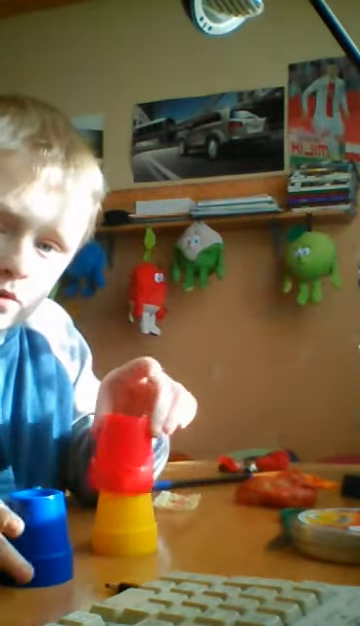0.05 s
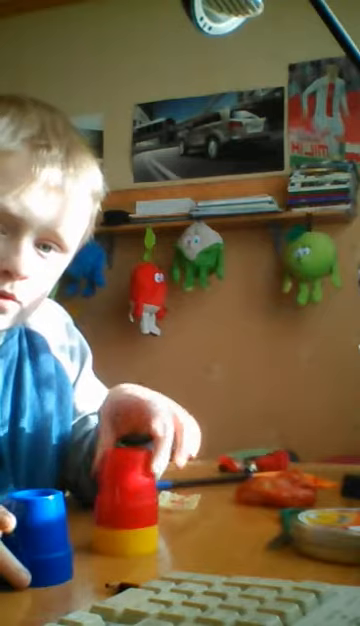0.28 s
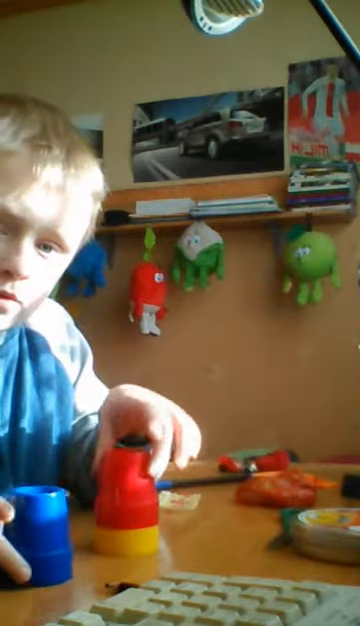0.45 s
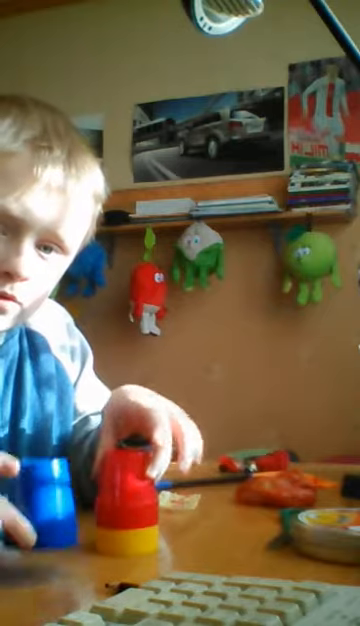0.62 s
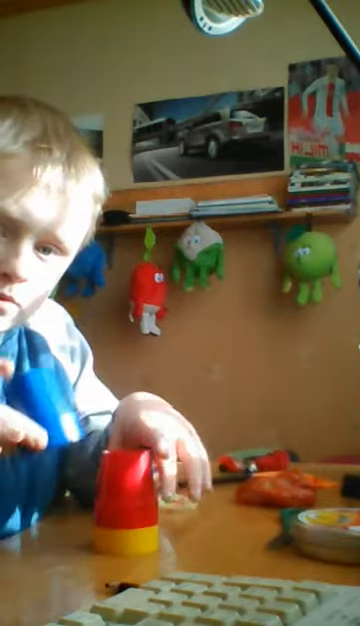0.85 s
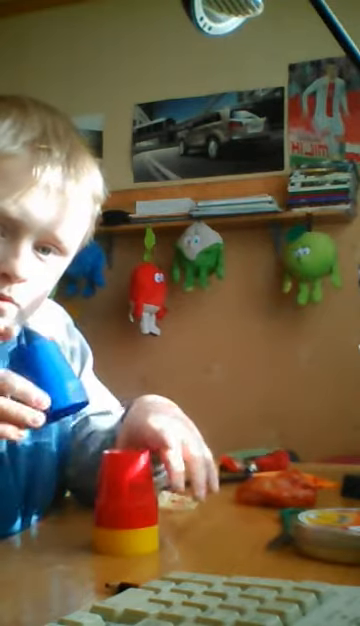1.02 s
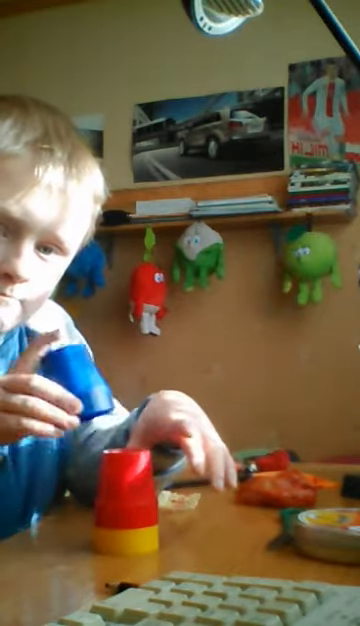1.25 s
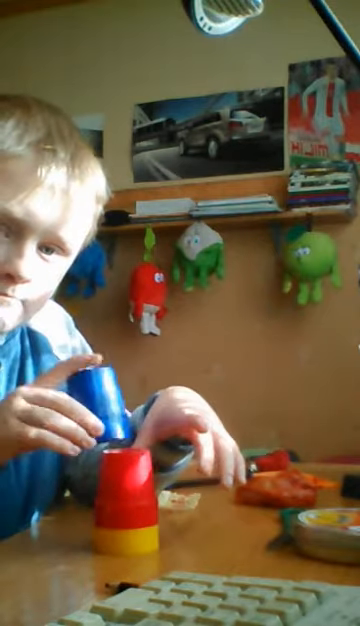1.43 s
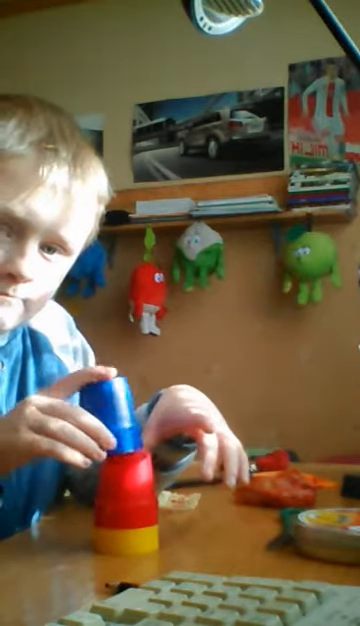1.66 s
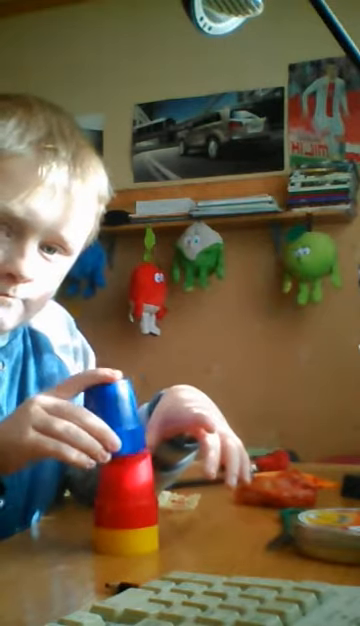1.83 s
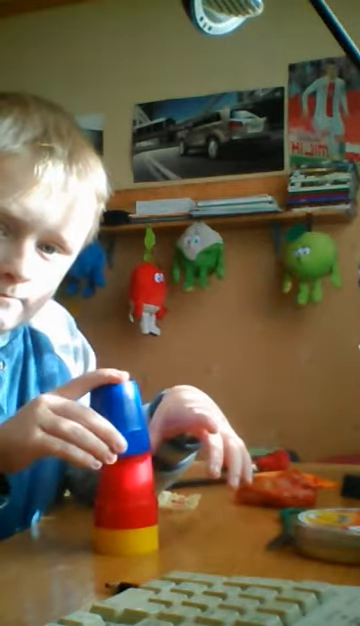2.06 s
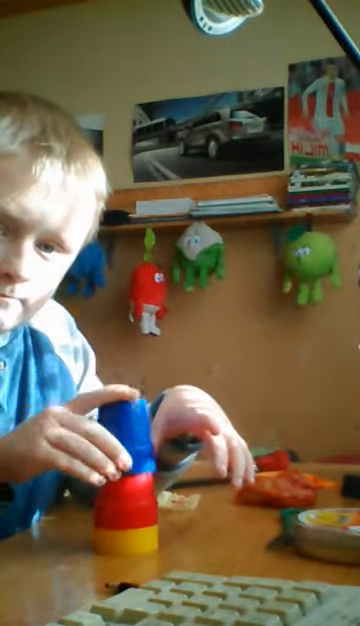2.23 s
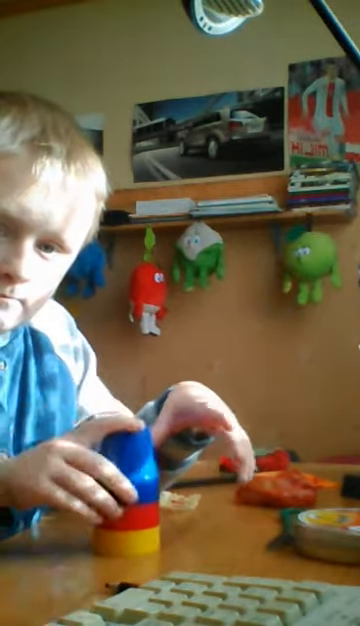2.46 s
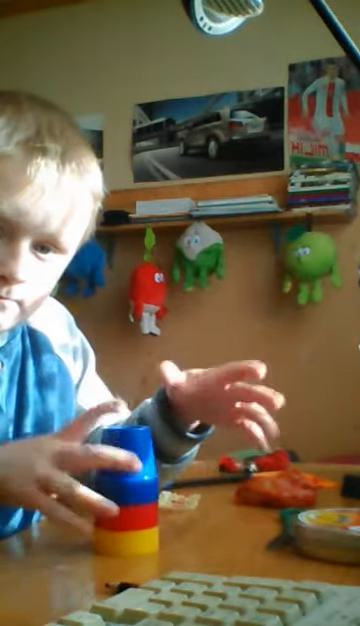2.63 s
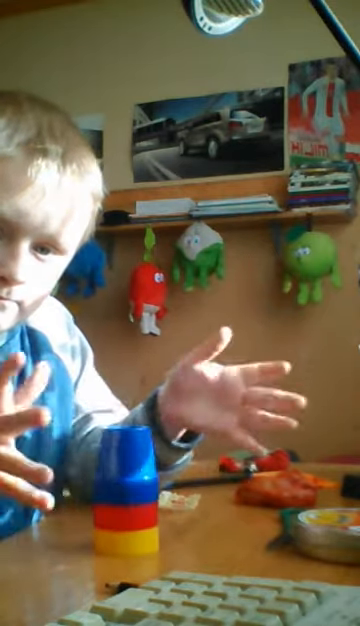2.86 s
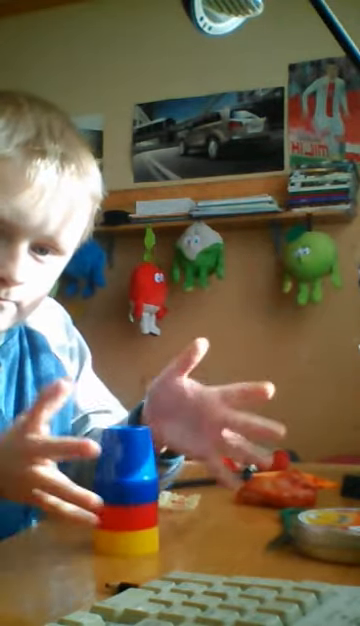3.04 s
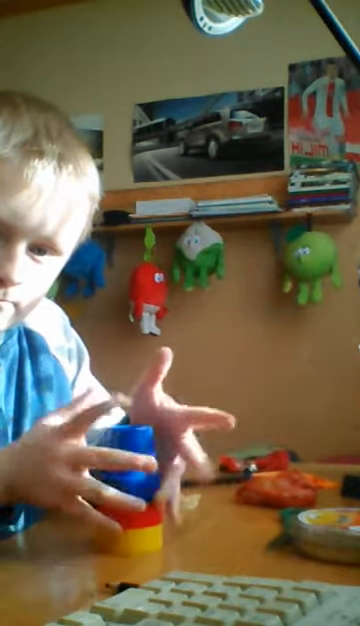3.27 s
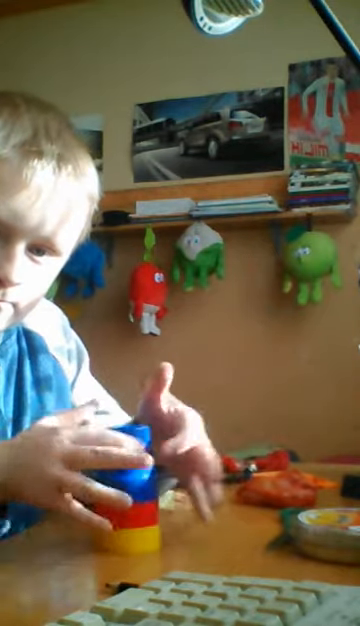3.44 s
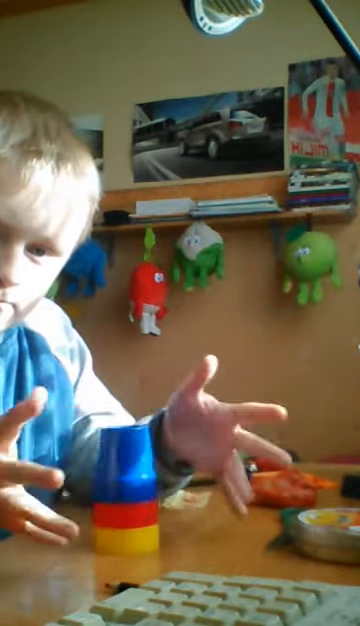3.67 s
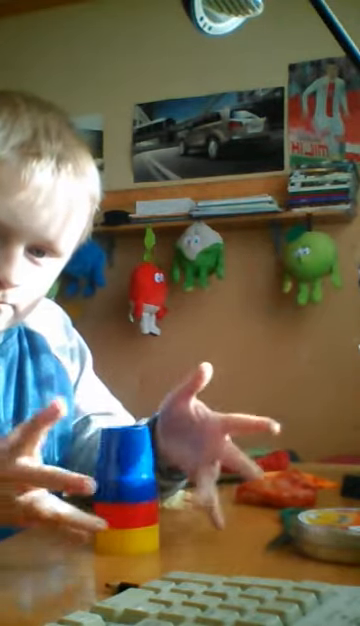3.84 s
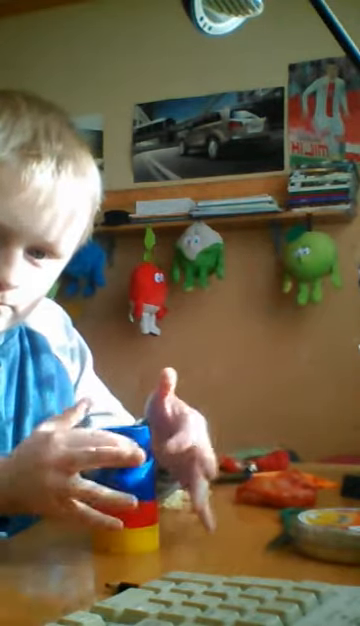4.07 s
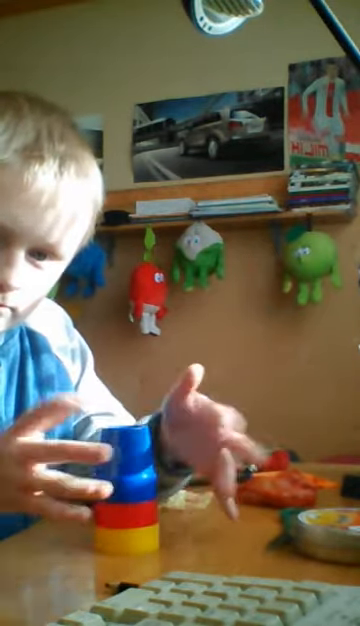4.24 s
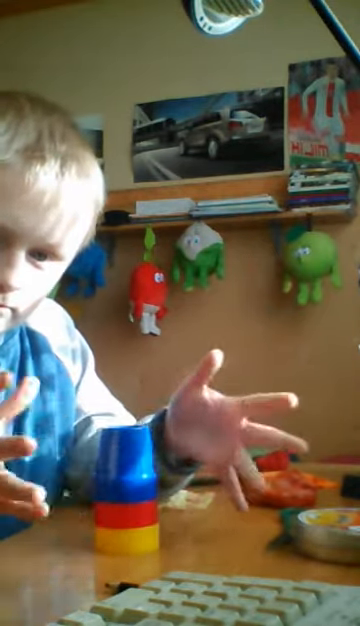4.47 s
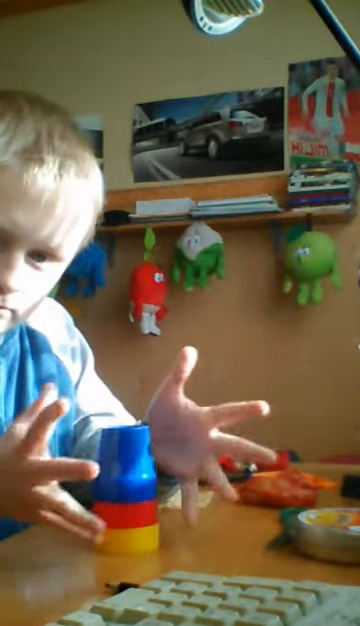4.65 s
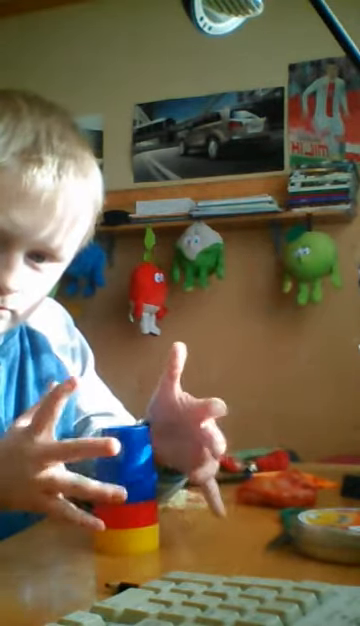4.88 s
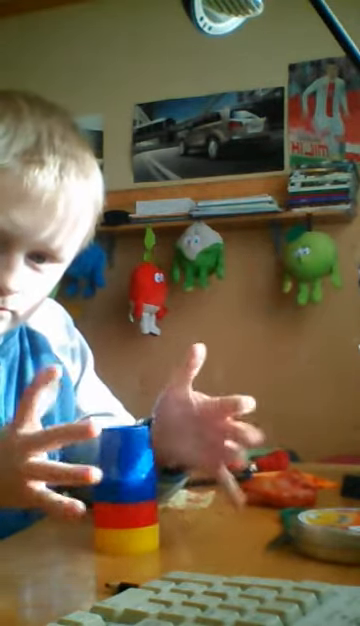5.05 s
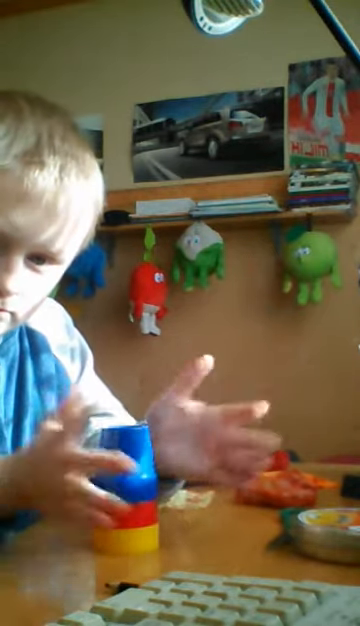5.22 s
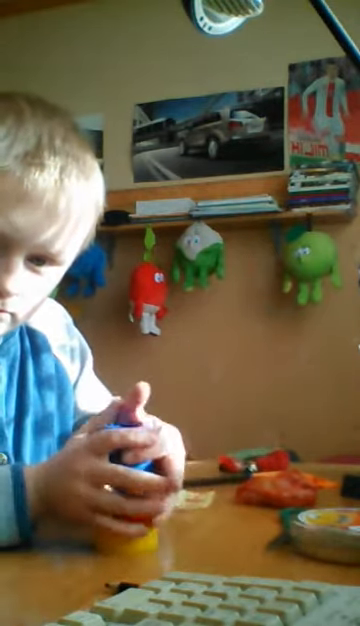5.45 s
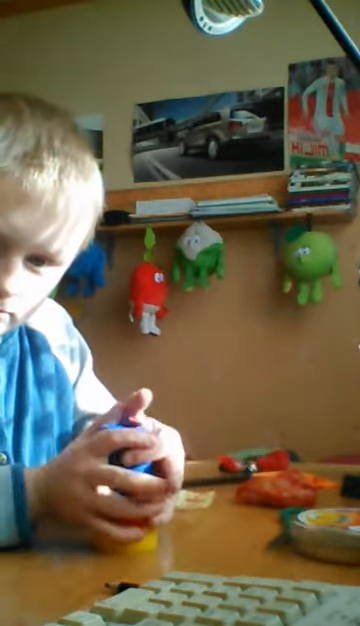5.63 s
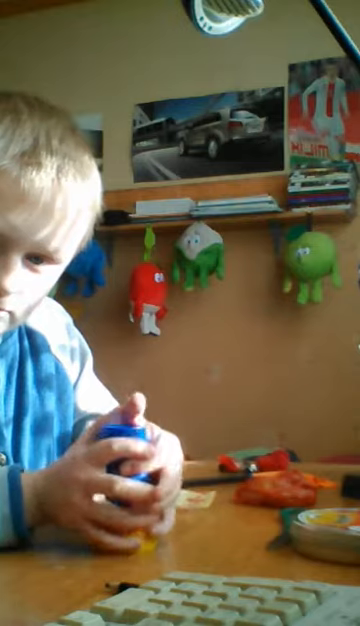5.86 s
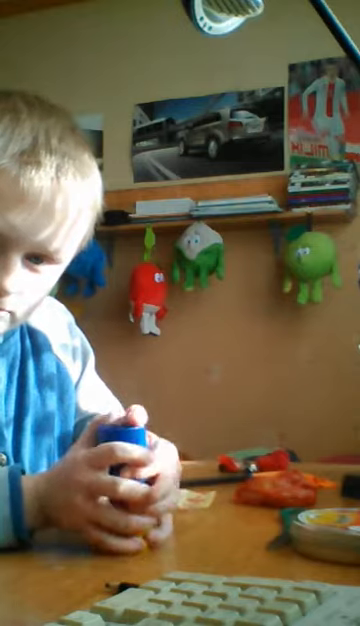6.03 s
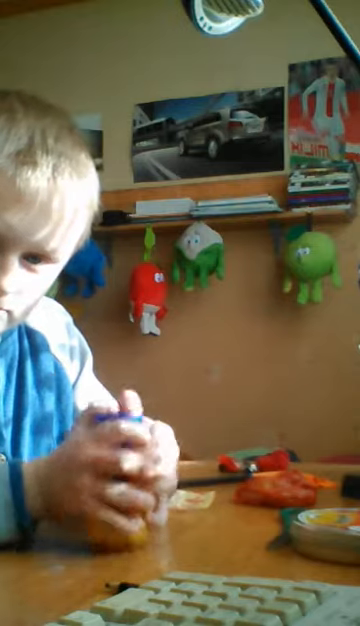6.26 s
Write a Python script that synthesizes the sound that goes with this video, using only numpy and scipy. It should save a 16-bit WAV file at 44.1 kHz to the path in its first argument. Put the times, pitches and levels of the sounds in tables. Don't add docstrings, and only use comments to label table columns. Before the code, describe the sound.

A small bedroom, close cheap microphone, low rumble and soft hiss throughout, with a barely audible wall clock ticking once a second from about 0.6. At 0.3 a rapid burst of hollow plastic clacks sounds as one cup drops over another, with a light desk thud and a soft tap at 0.45. Faint handling leads to plastic scraping from 1.4 and a crisp double knock at 1.55. Tiny touches run from 1.8 to 2.1, then a loud chattering clatter at 2.33-2.4 with a low desk thump and a brief scrape and rustle. Smaller taps come at 3.15-3.4. It stays quiet, with faint cloth movement and a tiny touch near 4.1, until a hard, bright clatter and thud at 5.3, a click and short rub at 5.4, a faint quick judder at 5.6, and soft finger taps from 5.7 to 6.05, fading into room hiss.

```python
import sys
import numpy as np
from scipy import signal
from scipy.fft import rfft, irfft
from scipy.io import wavfile

SR = 44100
rng = np.random.default_rng(int(sys.argv[2]) if len(sys.argv) > 2 else 0)


def generate_wav(sig):
    pcm = np.round(np.clip(np.atleast_2d(sig).T, -1, 1) * 32767).astype(np.int16)
    wavfile.write(sys.argv[1], SR, pcm)


def ratio_of_db(decibels):
    return 10 ** (np.asarray(decibels, float) / 20)


N = 277830

# start in seconds, level in dB, centre of the desk ring in Hz.
THUDS = [(.2859, -40, 220), (1.5482, -39, 251), (2.3334, -45, 250), (2.356, -28.5, 177), (2.545, -53, 240),
         (3.143, -44, 370), (3.158, -49.5, 374), (3.2622, -45.5, 220), (3.293, -50.5, 220),
         (3.384, -53, 241), (4.13, -54.5, 370.5), (5.3, -31, 160), (5.3089, -29.5, 330),
         (5.331, -40.5, 329), (5.8, -48, 220), (5.811, -43, 220), (5.823, -49, 221), (5.896, -52, 220)]


def cups():
    places = np.zeros((5, N))
    for k, row in enumerate(contacts()):
        chance, draw = rng.standard_normal(48), rng.random(900)
        size, noise = rng.standard_normal((2, 900))
        chatter = size * (draw < 2500 / SR)
        add(places[k % len(places)], *knock(row, chance, chatter, noise))
    for k, (s, db, hz) in enumerate(THUDS):
        thud = ring(DESK, rng.standard_normal(32), np.ones(1), 0.0046, hz)
        add(places[k % len(places)], s, ratio_of_db(db) * thud)
    no_bass = signal.butter(4, 105, "high", fs=SR, output="sos")
    places = signal.sosfilt(no_bass, places)
    return sum(near + ratio_of_db(-8) * room(near) for near in places)


# start in seconds, blow in dB, chatter in ms, hardness as treble in dB,
# centre of the wall ring in Hz.
CLACKS = [(.2805, -15, 4.7, -24, 1320), (.2859, -17, 9.1, -14.5, 1440), (0.2929, -23, 5.2, -13.5, 1160),
          (0.346, -12.5, 3.6, -21.5, 1700), (0.3497, -16, 4.4, -27.5, 1300), (1.5482, -13, 1.46, -25, 1460),
          (1.5515, -17, 2.46, -20, 1400), (2.207, -32, 11, -27, 1350), (2.3333, -16, 18, -21, 1120),
          (2.3515, -7, 4.5, -18.5, 1500), (2.356, -9.5, 4.2, -13.5, 1300), (2.3654, -10, 8.6, -16.5, 1190),
          (2.377, -18, 9.8, -9.5, 920), (2.52, -39, 15, -17, 1110), (2.545, -29, 6.5, -30.5, 1470),
          (3.144, -30.5, 4.6, -32, 1280), (3.2616, -27, 2, -31, 1280), (5.2934, -19.5, 7.4, -13, 1300),
          (5.3, -8, 5.05, -8, 1640), (5.305, -7, 4.7, -17.5, 1700), (5.3089, -10, 4.9, -11.5, 920),
          (5.317, -17, 6.5, -11, 890), (5.332, -16.5, 2.6, -26, 1550), (5.4227, -24.5, 2.2, -27, 1200)]
# start in seconds, blow in dB, chatter in ms,
# centre of the wall ring in Hz.
TAPS = [(0.074, -50.5, 9.9, 1250), (.457, -35.5, 7.7, 770), (1.78, -42.5, 16, 930), (1.799, -41, 11, 900),
        (1.826, -48, 10, 840), (1.844, -42, 1.1, 770), (2.035, -49, 17, 790), (2.064, -37, 1.5, 1400),
        (2.0696, -35, 8.7, 1104), (3.151, -28.5, 5.5, 955), (3.158, -32.5, 10, 800), (3.196, -44, 20, 1280),
        (3.2579, -34, 1.9, 1360), (3.293, -47.5, 8.5, 985), (3.384, -51, 9, 700), (4.13, -47.5, 4.7, 1005),
        (4.157, -54.5, 4.8, 600), (5.2904, -31.5, 1.6, 1200), (5.403, -29, 2.4, 1540),
        (5.526, -46, 3.9, 804), (5.722, -45.5, 4.9, 1160), (5.7592, -44, 2.1, 894),
        (5.7786, -39, 7.5, 1010), (5.799, -39.5, 11.5, 980), (5.811, -36.5, 2.3, 885),
        (5.823, -37.5, 12, 810), (5.848, -43, 5.5, 694), (5.867, -42.5, 3.4, 870), (5.896, -51, 7.3, 910),
        (6.04, -49.5, 13, 850)]


def contacts():
    clack_desk_db = -39
    tap_hard_db, tap_desk_db = -28.5, -20.5
    slips, first_s, gap_s = 11, 5.588, .0147
    k = np.arange(slips)
    wall_db = -58.5 + 0.57 * k
    desk_db = -54 + 5.5 * np.sin(np.pi * np.sqrt((k + .5) / (slips + 2)))
    judder = zip(first_s + k * gap_s, wall_db, desk_db - wall_db)
    return sorted([(s, db, ms, hard_db, clack_desk_db, hz) for s, db, ms, hard_db, hz in CLACKS]
                  + [(s, db, ms, tap_hard_db, tap_desk_db, hz) for s, db, ms, hz in TAPS]
                  + [(s, db, 3, tap_hard_db, thump_db, 850) for s, db, thump_db in judder])


# frequency in Hz, level in dB, t60 in seconds.
WALL = [(398, -6, .05), (470, -16.5, 0.012), (550, -8.5, 0.09), (636, -6, 0.047), (669, -0.5, 0.05),
        (790, -27, 0.048), (863, -7.5, 0.063), (1020, -7.5, 0.011), (1055.4, -5, 0.11), (1176, 0, 0.014),
        (1337, -13, 0.075), (1499.5, 1, 0.019), (1510, -8, 0.011), (1722, -4, .022), (1976, -6.5, 0.024),
        (2090, 2, 0.0094), (2150, -9, 0.043), (2388, -9, .02), (2650, -10.5, .018), (3000, -9, 0.0075),
        (3320, -9, 0.019), (3756, -12, 0.062)]
# frequency in Hz, level in dB per Hz.
RIM = [(1500, -20), (2700, -1), (4000, -4), (5300, -5.5), (6200, -13), (6900, 0.5), (7500, 1), (8600, -5),
       (9800, -13.5), (11000, -14)]
# frequency in Hz, level in dB, t60 in seconds.
DESK = [(130, -4, .1), (190, -3, .06), (238, 0, .07), (300, -11, .04), (375, -14, .06)]


def knock(row, chance, chatter, noise):
    s, db, ms, hard_db, thump_db, centre_hz = row
    t = np.arange(len(chatter)) / SR
    age = t * 1000 / max(ms, .5)
    drive = .55 * chatter * np.exp(-age ** 4)
    drive[0] = 1
    drive /= np.linalg.norm(drive)
    sound = ring(WALL, chance[:32], drive, 0.00022, centre_hz, hard_db)
    held = np.maximum(np.arange(len(sound)) / SR - ms / 1000 - .003, 0)
    sound *= ratio_of_db(-9 * (1 - np.exp(-held / 0.0051)))
    crackle = signal.fftconvolve(drive, shaped(noise, RIM) * ratio_of_db(-60 * t / 0.01))
    add(sound, 0, ratio_of_db(hard_db + 9) * crackle / abs(crackle).max())
    add(sound, 0, ratio_of_db(thump_db) * ring(DESK, chance[16:], np.ones(1), 0.005))
    return s, ratio_of_db(db) * sound


def ring(modes, chance, drive, rise_s, centre_hz=None, hard_db=0, slope_db=10.0):
    hz, db, t60 = np.transpose(modes)[:, :, None]
    db = db + 1.5 * chance[:len(modes), None]
    if centre_hz:
        floor_db = np.where(hz < centre_hz, 24, 12)
        db = db - np.minimum(slope_db * np.log2(hz / centre_hz) ** 2, floor_db)
        db = db + 0.78 * (hard_db + 21) * np.clip(np.log2(hz / 2000), 0, .7)
    t = np.arange(4000) / SR
    fed = abs(np.exp(2j * np.pi * hz * t[:len(drive)]) @ drive)[:, None]
    sign = np.sign(chance[::-1][:len(modes), None])
    waves = sign * np.sin(2 * np.pi * hz * t) / np.maximum(fed, .4)
    one_blow = (ratio_of_db(db - 60 * t / t60) * waves).sum(0) * (1 - np.exp(-t / rise_s))
    sound = signal.fftconvolve(drive, one_blow)
    return sound / abs(sound).max()


# peak in seconds, level in dB, rise in ms, fall in ms.
DRAGS = [(.27, -59.5, 120, 160), (.6, -61, 200, 750), (1.19, -57.5, 56, 130), (1.395, -47, 24, 340),
         (1.46, -44.5, 92, 380), (1.56, -50.5, 280, 280), (1.77, -62, 200, 96), (1.93, -66, 132, 350),
         (2.2, -54, 360, 210), (2.42, -41.5, 66, 210), (2.51, -45, 370, 60), (2.64, -62, 186, 150),
         (3.188, -50.5, 47, 116), (3.44, -56.5, 140, 49), (4.12, -70.5, 110, 170), (5.4, -41.5, 80, 87),
         (5.7, -67, 920, 430), (5.94, -65.5, 84, 90), (6.05, -66, 130, 500)]
# peak in seconds, level in dB, rise in ms, fall in ms.
SWISHES = [(.13, -63, 120, 480), (.27, -60, 180, 200), (.7, -73.5, 800, 810), (1.19, -67, 150, 150),
           (1.395, -52, 30, 370), (1.5, -55, 180, 110), (1.7, -78, 400, 300), (2.19, -57.5, 210, 240),
           (2.42, -42, 71, 142), (3.188, -63, 93, 280), (3.43, -69, 400, 800), (3.97, -63.5, 216, 390),
           (4.2, -69.5, 300, 640), (4.65, -63.5, 400, 480), (5.245, -61.5, 37.6, 400),
           (5.4, -54.5, 210, 88), (5.85, -61, 170, 160), (5.68, -72, 500, 340), (6.05, -69.5, 130, 500)]
# frequency in Hz, level in dB per Hz.
SCRAPE = [(120, -23), (200, -16), (290, -8.5), (640, -4), (800, -1), (1050, -2.5), (1400, 2.5), (1900, -9),
          (3000, -17), (6000, -18.5), (11000, -43.5)]
# frequency in Hz, level in dB per Hz.
RUSTLE = [(1500, -5), (3000, -12), (5500, -9), (7700, 0.5), (9000, -5), (10200, -22), (11500, -39.5)]


def sliding():
    sing = 0.35
    grit = rng.standard_normal(N) * ratio_of_db(1.4 * drift(90))
    rustle = evened(shaped(rng.standard_normal(N) * ratio_of_db(0.42 * drift(120)), RUSTLE))
    walls = ring(WALL, rng.standard_normal(32), np.ones(1), 0.0004, 1100, -29)
    rubbed = evened(shaped(grit, SCRAPE))
    singing = evened(signal.fftconvolve(grit, walls)[:N])
    scrape = evened((1 - sing) * rubbed + sing * singing)
    return strokes(DRAGS) * scrape + strokes(SWISHES) * rustle


def strokes(rows):
    stroke_db, rest_db = 20, -86
    t = np.arange(0, N, 64) / SR
    s, db, rise_ms, fall_ms = np.transpose(rows)[:, :, None]
    away = 1000 * np.where(t < s, (s - t) / rise_ms, (t - s) / fall_ms)
    power = (ratio_of_db(db - stroke_db * away) ** 2).sum(0) + ratio_of_db(rest_db) ** 2
    return np.interp(np.arange(N) / SR, t, np.sqrt(power))


# start in seconds, level in dB.
TICKS = [(.632, -58.5), (1.635, -59), (2.633, -59), (3.631, -57), (4.636, -60), (5.634, -58)]
# frequency in Hz, level in dB per Hz.
TICK = [(700, -17), (1500, -6), (2500, -17.5), (3700, -8), (4500, -11), (6500, -7.5), (8000, -5),
        (9500, -12.5), (10800, -22)]


def clock():
    t, out = np.arange(6000) / SR, np.zeros(N)
    for s, db in TICKS:
        shape = (1 - np.exp(-t / 0.0035)) * np.exp(-t / 0.035)
        rattle = evened(shaped(rng.standard_normal(len(t)), TICK))
        add(out, s, ratio_of_db(db + 5) * shape * rattle)
    return out


# time in seconds, rumble level in dB, hiss drift in dB.
RUMBLE = [(0, -64.5, 5.5), (1.2, -64.5, 1.5), (1.6, -66, 3), (1.9, -65, 4.3), (2.3, -65, 4), (2.6, -65, 3),
          (3.051, -65, 1.5), (3.299, -65, 0), (6.3, -64.5, 3.5)]
# frequency in Hz, level in dB.
HISS = [(53, -64.5), (90, -7.5), (189, 0), (232, -5), (650, -8), (900, -15), (1500, -16), (3000, -23),
        (6000, -29.5), (8000, -26), (10000, -33.5), (12400, -48.5)]


def air():
    s, db, drift_db = np.transpose(RUMBLE)
    t = np.arange(N) / SR
    lump = [(25, -43), (40, -3.0), (52, -2.5), (70, -9.5), (110, -16.5), (300, -31.5)]  # Hz, dB
    rumble = evened(shaped(rng.standard_normal(N), lump))
    hiss = evened(shaped(rng.standard_normal(N), HISS))
    whine = ratio_of_db(-88) * np.sin(2 * np.pi * 8070 * t)
    hiss_gain = ratio_of_db(-71 + np.interp(t, s, drift_db))
    return hiss_gain * hiss + whine + ratio_of_db(np.interp(t, s, db)) * rumble


# frequency in Hz, t60 in seconds.
ROOM = [(120, 0.25), (400, 0.53), (1000, 0.21), (2500, 0.33), (7000, 0.15), (11000, 0.19)]


def room(x):
    echoes = np.zeros(SR // 2)
    at = np.arange(160, len(echoes) - 20, 20)
    echoes[at + rng.integers(0, 20, len(at))] = rng.choice([-1., 1.], len(at))
    hz, t, z = signal.stft(echoes, SR, nperseg=256)
    tail = signal.istft(z * ratio_of_db(-60 * t / read(ROOM, hz)[:, None]), SR, nperseg=256)[1]
    tail = shaped(tail, [(100, 0.0), (1000, -2.0), (2200, -7.0), (3500, 0.5), (7500, 9.5), (11000, 0.0)])
    return signal.fftconvolve(x, tail / np.linalg.norm(tail))[:N]


def evened(x):
    return x / np.sqrt(np.mean(x ** 2) + 1e-20)


def read(points, hz):
    f, value = np.transpose(points)
    return np.interp(np.log(hz + 1), np.log(f + 1), value)


def add(mix, s, sound):
    part = mix[round(s * SR):][:len(sound)]
    part += sound[:len(part)]


def shaped(x, points):
    gain = ratio_of_db(read(points, np.fft.rfftfreq(len(x), 1 / SR)))
    return irfft(rfft(x) * gain, len(x))


def drift(hz):
    slow = signal.butter(2, hz, fs=SR, output="sos")
    return evened(signal.sosfilt(slow, rng.standard_normal(N)))


def scene():
    return (cups() + sliding() + clock() + air())[None]


def roll_off(x):
    return signal.sosfilt(signal.butter(12, 12500, fs=SR, output="sos"), x)


# frequency in Hz, gain in dB.
EDGE = [(20, -31.5), (40, -3.5), (100, -1.5), (9800, 0), (10500, -4.5), (11000, -18), (12350, -25),
        (12700, -92)]


def record(dry):
    overloaded = 0.67 * np.tanh(dry[0] / 0.69)
    mix = shaped(overloaded, EDGE)[None]
    return roll_off(mix)


dry = scene()
out = record(dry)
generate_wav(out)
```